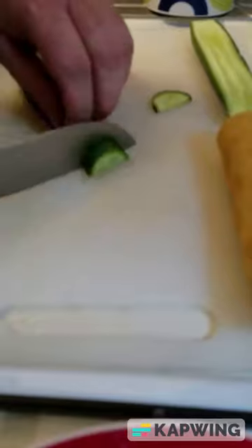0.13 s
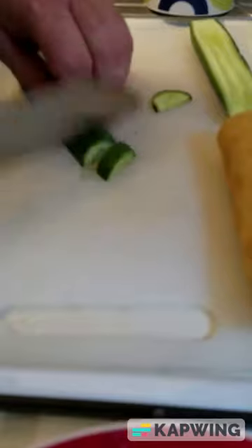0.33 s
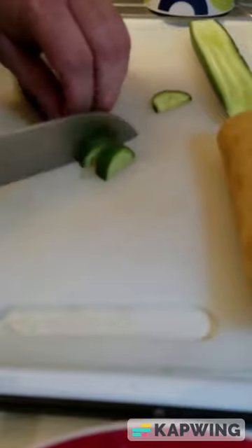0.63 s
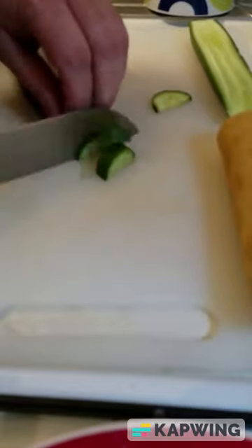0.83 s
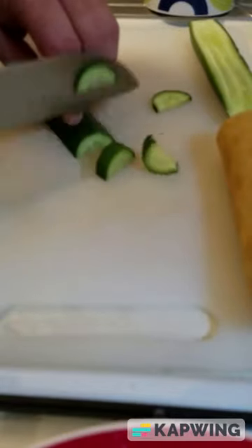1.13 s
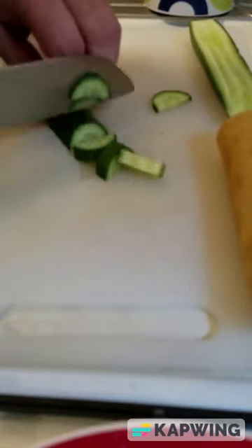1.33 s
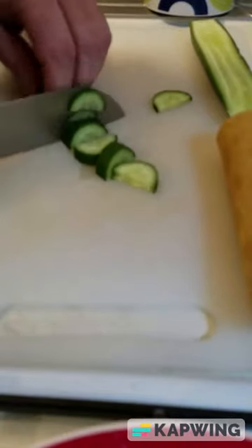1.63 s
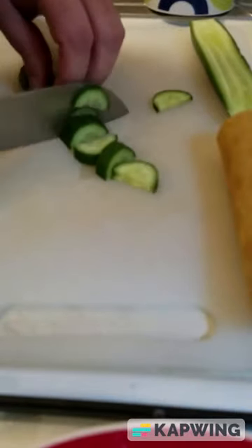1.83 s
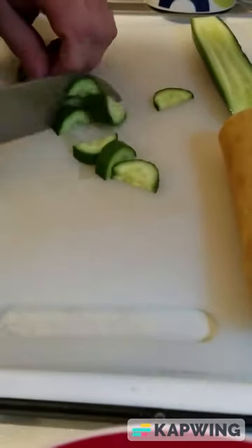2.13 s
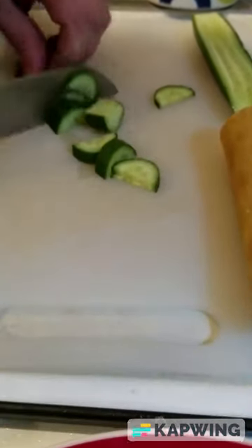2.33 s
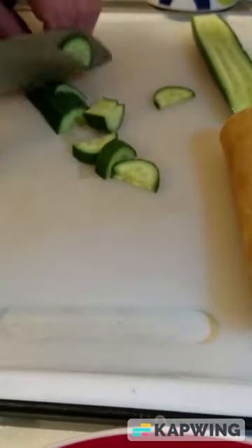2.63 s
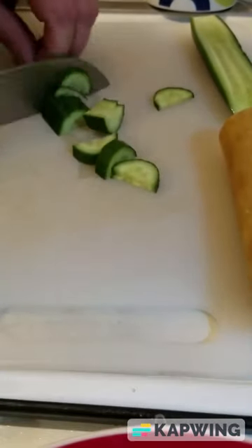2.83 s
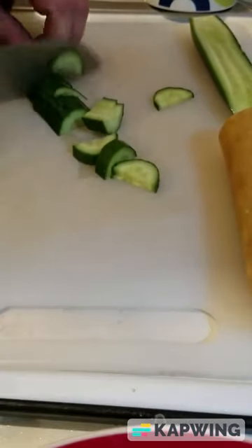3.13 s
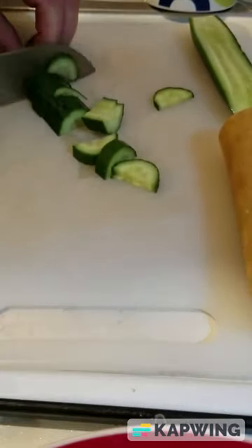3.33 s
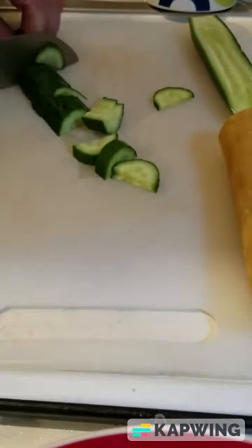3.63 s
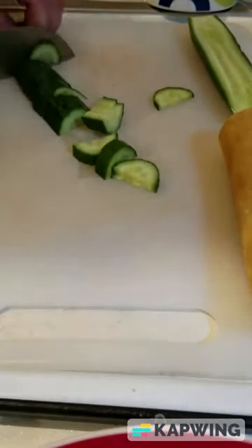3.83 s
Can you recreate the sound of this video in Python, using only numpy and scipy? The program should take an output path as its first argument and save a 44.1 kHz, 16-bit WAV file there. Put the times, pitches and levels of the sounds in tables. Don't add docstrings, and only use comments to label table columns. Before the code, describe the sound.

A knife chops a cucumber in quick, regular strokes, knocking sharply on a plastic board.

```python
import sys
import numpy as np
from scipy import signal
from scipy.fft import rfft, irfft
from scipy.io import wavfile
from scipy.ndimage import uniform_filter1d

SR = 44100
rng = np.random.default_rng(int(sys.argv[2]) if len(sys.argv) > 2 else 0)


def log_audio(samples):
    frames = np.atleast_2d(samples).T
    limited = np.clip(frames, -1, 1)
    pcm = np.round(limited * 32767).astype(np.int16)
    wavfile.write(sys.argv[1], SR, pcm)


def voltage_ratio(decibels):
    exponent = np.asarray(decibels, float) / 20
    return 10 ** exponent


N = 176400


def rms_one(x):
    return x / np.sqrt(np.mean(x ** 2) + 1e-20)


def at_hz(points, hz, column=1):
    points = np.array(points)
    return np.interp(np.log(hz), np.log(points[:, 0]), points[:, column])


def bandpass(x, low_hz, high_hz):
    return signal.sosfilt(signal.butter(2, [low_hz, high_hz], "band", fs=SR, output="sos"), x)


def ring(clicks, hz, t60):
    radius = voltage_ratio(-60 / (t60 * SR))
    w = 2 * np.pi * hz / SR
    return signal.lfilter([0, np.sin(w)], [1, -2 * radius * np.cos(w), radius ** 2], clicks + 1e-18)


def burst(start, end, rise, fade):
    t = np.arange(N) / SR
    return np.clip((t - start) / rise, 0, 1) * np.exp(-np.maximum(t - end, 0) / fade)


# frequency in Hz, left-right correlation (-1 to 1).
PORT_LIKENESS = [(60, -0.48), (130, 0.73), (290, 0.91), (640, 0.69), (1410, -0.4), (3100, -0.13),
                 (6820, 0.13), (15000, 0.7)]


def coloured(spectrum, size=N):
    hz = np.maximum(np.arange(size // 2 + 1) * SR / size, 10)
    mid, side = rfft(rng.standard_normal((2, size)))
    alike = np.clip(at_hz(PORT_LIKENESS, hz), -1, 1)
    both = np.sqrt(1 + alike) * mid + np.sqrt(1 - alike) * side * [[1], [-1]]
    low_cut = np.minimum(hz / spectrum[0][0], 1) ** 2
    return rms_one(irfft(both * low_cut * voltage_ratio(at_hz(spectrum, hz)), size))


# frequency in Hz, level in dB per Hz.
ROOM_NOISE = [(15, -24), (25, -12), (69, -32), (309, -9.5), (655, -16), (7890, -48), (8550, -49.5),
              (13800, -39.5), (15000, -44)]


def room_noise():
    drone = rms_one(ring(rng.standard_normal(N), hz=295.5, t60=0.14))
    return voltage_ratio(-50.5) * coloured(ROOM_NOISE) + voltage_ratio(-63) * drone


# start in seconds, crunch level in dB, skin snap level in dB.
CUTS = [(0.1524, -53, -48), (0.394, -38, -36), (0.618, -38, -41), (0.8285, -33.5, -41), (1.0248, -36, -43),
        (1.248, -32.5, -33), (1.434, -40.5, -31), (1.6125, -34, -50), (1.8041, -30, -51),
        (1.9734, -30, -48), (2.1555, -34.5, -66), (2.3306, -25, -50), (2.5296, -27.5, -38),
        (2.698, -27, -54), (2.85, -27, -52), (3.015, -25.5, -48), (3.1747, -28, -40), (3.3343, -31, -50),
        (3.4885, -31.5, -35), (3.642, -32.5, -38), (3.7978, -32.5, -32)]
# frequency in Hz, level in dB per Hz.
SNAP_COLOUR = [(400, 4.5), (800, 0), (1500, -9), (2500, -22), (6000, -19)]


def skin_snap():
    shape = sum(voltage_ratio(db) * burst(s, s + 0.0072, rise=0.00075, fade=0.003) for s, _, db in CUTS)
    return shape * coloured(SNAP_COLOUR)


# frequency in Hz, level in dB per Hz.
CRUNCH_COLOUR = [(120, -16), (200, -7), (671, -2), (2420, -4.5), (2900, -5), (4470, -14), (8880, -17),
                 (13200, -17.5), (15000, -28)]


def flesh_crunch():
    shape = np.zeros(N)
    for (start, db, _), knock in zip(CUTS, KNOCKS):
        shape += voltage_ratio(db - 2.5) * burst(start, knock[0], rise=0.0046, fade=0.036)
    chance = rng.standard_normal((2, N))
    fine = rms_one(uniform_filter1d(chance[0], size=30))
    clumps = rms_one(uniform_filter1d(chance[1], size=200))
    grain = voltage_ratio(4 * fine + 1.76 * clumps)
    return shape * grain * coloured(CRUNCH_COLOUR)


# time in seconds, peak level in dB, brightness in dB, thud in dB, counter in dB.
KNOCKS = [(0.153, -14, -0.5, 1.5, -4.5), (0.404, -9.5, -1.5, 1.5, 5), (0.631, -11, 2.5, 3.5, 1.5),
          (0.841, -8, 0.5, 1.5, -4), (1.039, -8.5, -4.5, -2, -0.5), (1.259, -8.5, 2.5, 2.5, 3),
          (1.451, -10, -1, 0, -2), (1.628, -11.5, 1, 0, -4), (1.82, -10.5, 1.5, -2, 2),
          (1.992, -14, 3.5, 3.5, -2), (2.177, -14, 0.5, 1, -2.5), (2.343, -12.5, 2.5, 1.5, 1),
          (2.545, -11.5, 4, -4.5, 1.5), (2.715, -11, 0.5, -1.5, -3.5), (2.864, -14.5, 6, 0.5, 0.5),
          (3.026, -10, 1.5, -5, 0.5), (3.193, -13, 3, -7.5, -3.5), (3.355, -13, 3, -6.5, 2.5),
          (3.512, -14, 1.5, -2.5, 4), (3.669, -12.5, -2, -5.5, 0.5), (3.819, -13, 1.5, -0.5, 4.5)]
# frequency in Hz, level in dB per Hz.
CRACK_COLOUR = [(1500, 14), (3500, -5), (6000, -14.5), (10000, -29.5), (15000, -17)]


def edge_crack():
    shape = np.zeros(N)
    for s, db, bright, *_ in KNOCKS:
        shape += voltage_ratio(db + bright - 4) * burst(s, s, rise=0.00091, fade=0.0094)
    return shape * coloured(CRACK_COLOUR)


# delay after the knock in seconds, level in dB.
BOUNCES = [
    (0, 1),
    (.003, -2.5),
    (.008, -3.5),
    (.016, -8),
]
# frequency in Hz, level in dB, decay time t60 in seconds.
BOARD_MODES = [(289.2, -8, 0.072), (384.5, -5.5, 0.076), (463, 1.5, 0.042), (581.5, 4, 0.028),
               (704, 2.5, 0.032), (876.4, 3, 0.026), (1030, 3.5, 0.018), (1330, 2.5, 0.02),
               (1653, -11.5, 0.015), (1911, 1.5, 0.02), (2146, 2.5, 0.01), (2495, -6, .025),
               (2978, -10, 0.014)]


def board():
    board_db, spot_spread_db = -9, 5
    knocks, bounces = np.array(KNOCKS), np.array(BOUNCES)
    time, peak, bright, thud, counter = knocks.T
    spot = rng.standard_normal((len(knocks), len(bounces), len(BOARD_MODES)))
    stretch = rng.uniform(0.8, 1.3, (len(knocks), len(bounces)))
    where = ((time[:, None] + stretch * bounces[:, 0]) * SR).astype(int)
    ringing = np.zeros(N)
    for k, (hz, db, t60) in enumerate(BOARD_MODES):
        octaves = np.log2(hz / 700)
        tilt = bright * np.clip(octaves, 0, 1) + thud * np.clip(-octaves, 0, 1)
        level = (peak + tilt)[:, None] + bounces[:, 1] + db + board_db + spot_spread_db * spot[:, :, k]
        clicks = np.zeros(N)
        clicks[where] = (-1) ** k * voltage_ratio(level)
        ringing += ring(clicks, hz, t60)
    push = np.zeros(N)
    push[where[:, 0]] = voltage_ratio(counter - 39.5)
    thump = ring(push, hz=133.9, t60=0.092)
    return bandpass(ringing, 251, 4960) + bandpass(thump, 70, 220)


# start in seconds, length in seconds, level in dB.
SLIDES = [
    (0.351, 0.02, -48),
    (1.231, 0.009, -58),
    (2.084, .012, -51),
    (3.295, 0.0056, -50),
    (3.938, 0.026, -46),
]
# frequency in Hz, level in dB per Hz.
SLIDE_COLOUR = [(1000, -1), (3000, 16.5), (6000, 5.5), (15000, 5)]


def slice_slides():
    shape = sum(voltage_ratio(db) * burst(s, s + length, rise=0.0037, fade=0.016) for s, length, db in SLIDES)
    return shape * coloured(SLIDE_COLOUR)


def ports(x):
    lag_s, left_db = 0.00031, 1
    t = np.arange(N)
    return np.array([voltage_ratio(left_db) * x, np.interp(t - lag_s * SR, t, x)])


# frequency in Hz, decay time t60 in seconds, level in dB per Hz.
KITCHEN_DECAY = [(59, 0.2, 9), (280, 0.27, 4.5), (750, 0.31, 0.5), (1860, 0.29, 0.5), (5000, 0.26, 2.5),
                 (13000, 0.15, 3.5)]


def kitchen(x, size=16384):
    kitchen_db, build_s = -2, 0.0013
    same_share = 0.79
    t = np.arange(size) / SR
    white = coloured([(20, 0), (20000, 0)], size=size)
    edges = 80 * 2 ** np.arange(0, 8.1, 0.5)
    hz = np.sqrt(edges[1:] * edges[:-1])
    bands = np.array([bandpass(white, low, high) for low, high in zip(edges, edges[1:])])
    start_db = at_hz(KITCHEN_DECAY, hz, column=2)[:, None] + kitchen_db - 27
    t60 = at_hz(KITCHEN_DECAY, hz)[:, None]
    dying = voltage_ratio(start_db - 60 * t / t60) * (1 - np.exp(-t / build_s))

    def pattern(shift):
        return np.einsum("bct,bt->ct", np.roll(bands, shift, axis=2), dying)

    same = pattern(0)
    out = np.zeros((2, N + size))
    marks = [int(s * SR) - 200 for s, _, _ in CUTS] + [N]
    for start, end, shift in zip(marks, marks[1:], rng.integers(0, size, len(CUTS))):
        echo = np.sqrt(same_share) * same + np.sqrt(1 - same_share) * pattern(shift)
        out[:, start:end + size - 1] += signal.fftconvolve(x[None, start:end], echo, axes=1)
    return out[:, :N]


def scene():
    near = ports(board()) + skin_snap() + flesh_crunch() + edge_crack() + slice_slides()
    return near + kitchen(near[0]) + room_noise()


def band_limit(x):
    return signal.sosfilt(signal.butter(12, 15890, fs=SR, output="sos"), x)


def record(dry):
    open_s, close_s, closed_db, cutoff_hz = 0.149, 3.987, -11, 14650
    t = np.arange(N) / SR
    opening = np.clip((t - open_s) / 0.0069, 0, 1) ** 2
    gate = opening * np.where(t > close_s, voltage_ratio(closed_db), 1)
    top_cut = signal.cheby2(10, 40, cutoff_hz * 1.04, fs=SR, output="sos")
    mix = signal.sosfilt(top_cut, dry * gate)
    return band_limit(mix)


dry = scene()
out = record(dry)
log_audio(out)
```